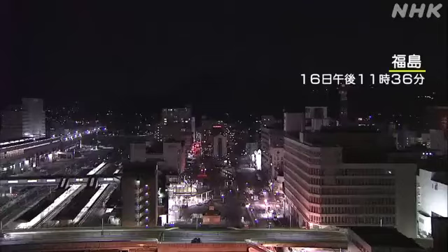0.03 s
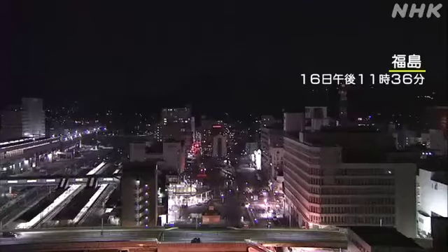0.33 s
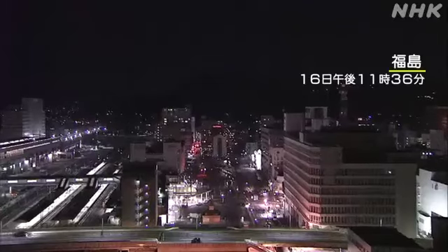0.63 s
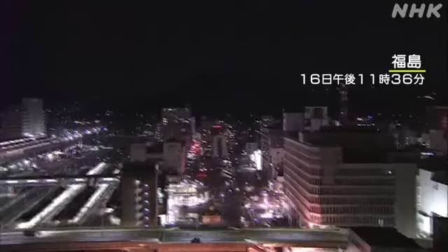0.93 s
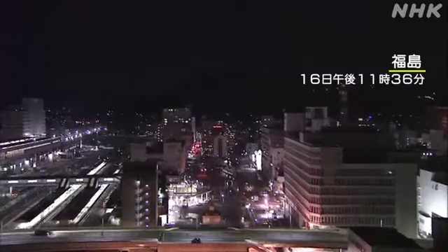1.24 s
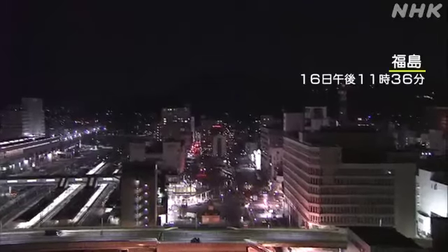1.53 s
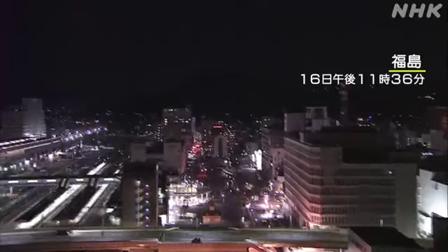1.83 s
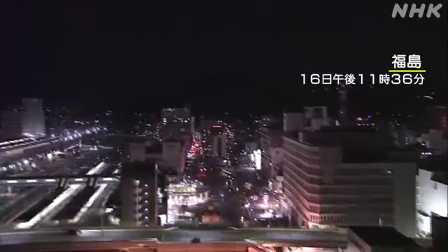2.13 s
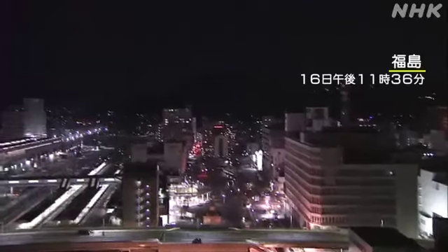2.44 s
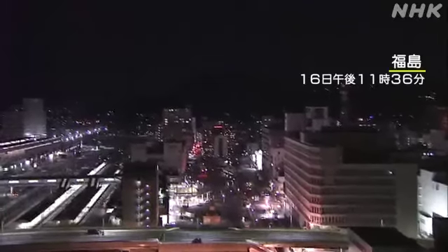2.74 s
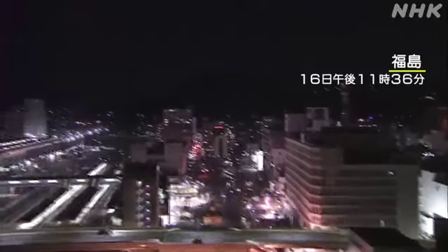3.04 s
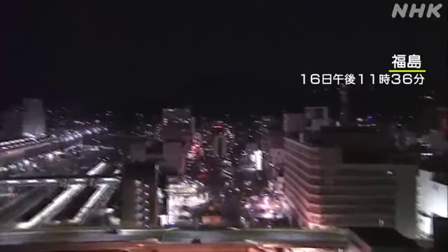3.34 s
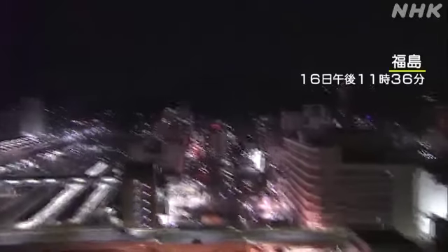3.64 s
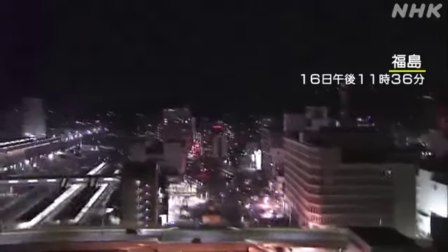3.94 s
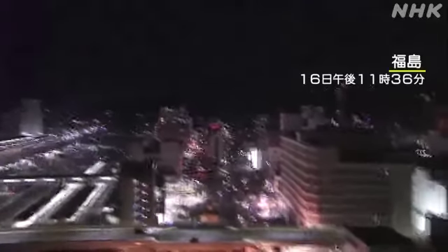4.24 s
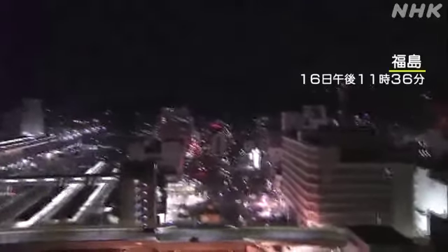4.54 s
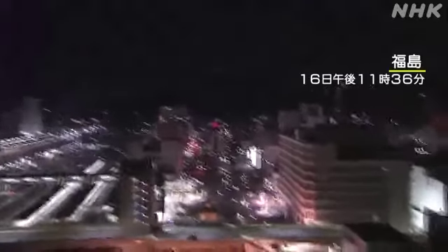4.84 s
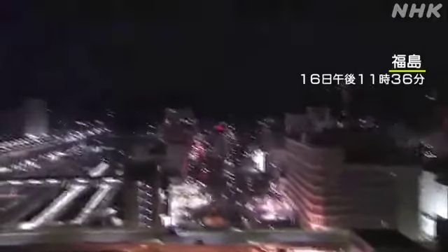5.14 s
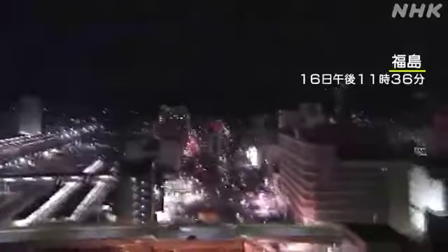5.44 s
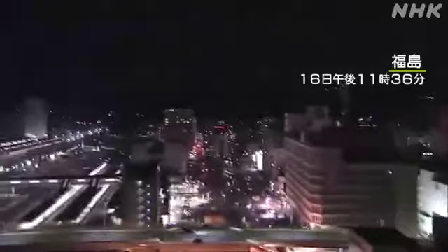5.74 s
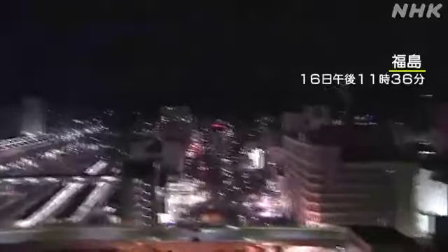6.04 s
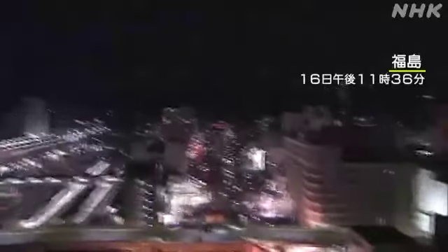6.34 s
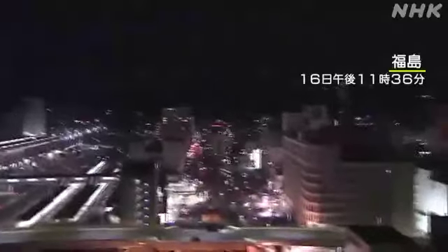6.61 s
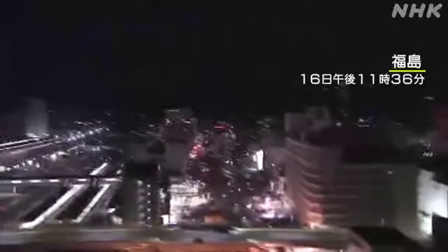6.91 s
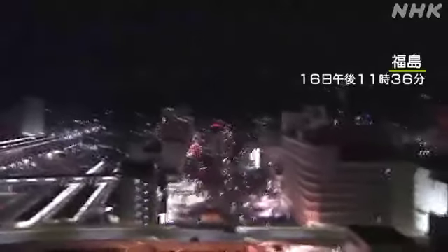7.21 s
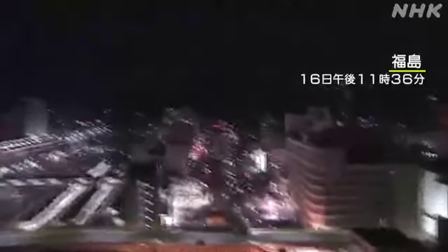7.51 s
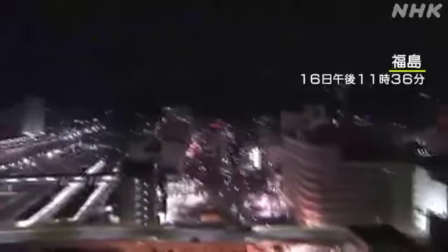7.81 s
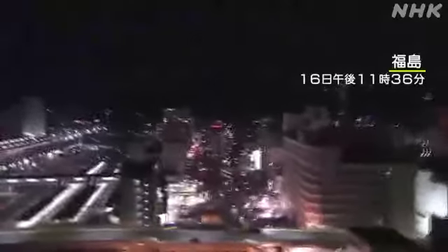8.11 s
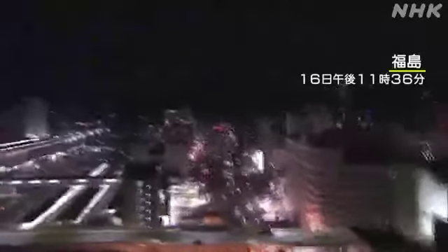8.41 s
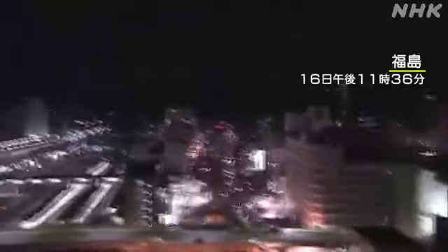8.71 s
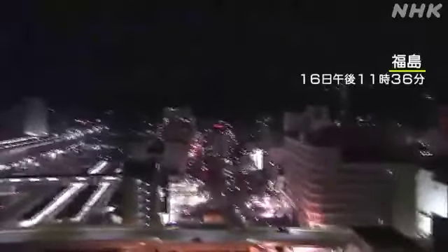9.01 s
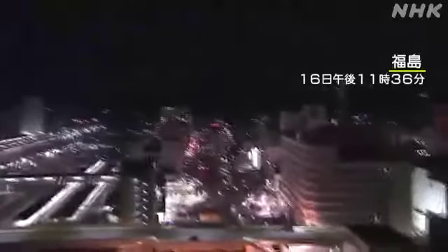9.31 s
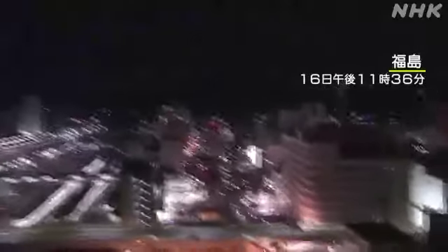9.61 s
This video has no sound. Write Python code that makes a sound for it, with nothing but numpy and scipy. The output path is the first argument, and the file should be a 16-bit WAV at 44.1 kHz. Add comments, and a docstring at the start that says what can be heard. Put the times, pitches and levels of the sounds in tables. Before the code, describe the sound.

A loose camera mount clicks and rattles irregularly while low rumbling and creaking grow as an earthquake strengthens.

```python
"""On a rooftop at night, an earthquake shakes a camera on its mast. The mast sways and booms in surges,
and the joints of the housing crackle, creak and knock more and more as the tremor grows.
The main sound is a loose part of the mount, which clicks, rings and scrapes as it swings against its seat.
Everything comes through the structure, dry and nearly mono, over a faint hiss."""
import sys
import numpy as np
from scipy import signal
from scipy.fft import rfft, irfft, next_fast_len
from scipy.io import wavfile
from scipy.ndimage import map_coordinates

SR = 44100
rng = np.random.default_rng(int(sys.argv[2]) if len(sys.argv) > 2 else 0)


def file_out(sig):
    """Save sig as 16-bit WAV at sys.argv[1]."""
    # one column per channel
    cols = np.atleast_2d(sig).T
    # limit, then scale
    lim = np.clip(cols, -1, 1)
    pcm = np.round(lim * 32767).astype(np.int16)
    wavfile.write(sys.argv[1], SR, pcm)


N = 426006

# How the loose part rings when hit. Each row: frequency in Hz, relative level in dB.
PART_RING = [(300, -16.5), (1800, -26.5), (2580, -25), (2900, -7.5), (3250, -7), (3560, 1.5), (3740, 4.5),
             (4000, 1.5), (4250, -3.5), (4780, -3), (5130, -9.5), (5250, -9.5), (5900, -16.5),
             (6500, -17.5), (7500, -20), (8300, -19), (11000, -27.5), (11850, -34.5), (13000, -33.5)]
# How the shell of the housing rings. Each row: frequency in Hz, relative level in dB.
SHELL_RING = [(150, -25.5), (400, 8.5), (650, 6.5), (980, 4), (1200, 4), (1750, 5), (1930, 5.5), (2060, -2),
              (2450, 3.5), (2650, -5), (2900, 3), (3800, -8.5), (5800, -30.5), (12500, -47)]
STRONG_DB = -50  # the crackle level that counts as full shaking


def amp(db):
    """Turn decibels into a gain."""
    return 10 ** (np.asarray(db) / 20)


def unit(x):
    """Scale a signal to an average (rms) level of 1."""
    return x / np.sqrt(np.mean(x ** 2) + 1e-20)


def along(points, hz):
    """Read between (frequency, value) points on a logarithmic frequency scale."""
    freqs, values = np.transpose(points)
    return np.interp(np.log(hz + 1), np.log(freqs + 1), values)


def curve(points):
    """Join (seconds, value) points with straight lines, one value per sample."""
    times, values = np.transpose(points)
    return np.interp(np.arange(N) / SR, times, values)


def wobble(rate, step=16):
    """A smooth random curve through `rate` new values a second."""
    steps = np.arange(0, N + step, step)
    coarse = map_coordinates(rng.standard_normal(int(N * rate / SR) + 4), [steps * rate / SR])
    return np.interp(np.arange(N), steps, coarse)


def filtered(x, response):
    """Filter x; `response` gives the gain at each frequency."""
    size = next_fast_len(N + SR // 2)
    return irfft(rfft(x, size) * response(np.fft.rfftfreq(size, 1 / SR)), size)[..., :N]


def resonance(hz, ring_hz, width_hz):
    """The response of a mode: one pitch at which an object likes to ring."""
    return 1j * hz * width_hz / (ring_hz ** 2 - hz ** 2 + 1j * hz * width_hz)


def treble_share(hz):
    """A ramp from 0 below the treble to 1 within it."""
    return along([(5000, 0), (6500, 1)], hz)


def struck(gain_db):
    """The ring of an object with this spectrum after one sharp tap, peaking at about 1."""
    cepstrum = irfft(np.log(amp(gain_db)))
    half = len(cepstrum) // 2
    # folding onto the first half puts all the ringing after the tap
    cepstrum[1:half] *= 2
    cepstrum[half + 1:] = 0
    ring = irfft(np.exp(rfft(cepstrum)))
    return ring / np.abs(signal.hilbert(ring)).max()


def vibration(body, steadiness, memory_s):
    """A randomly shaken body with the given spectrum; friction evens out its swings over memory_s."""
    noise = rng.standard_normal(N)
    swing = unit(filtered(noise, lambda hz: amp(along(body, hz)) * (hz < body[-1][0])))
    window = signal.windows.hann(int(memory_s * SR) + 3)
    power = np.abs(signal.fftconvolve(swing ** 2, window / window.sum(), "same")) + .02
    return unit(swing / power ** (steadiness / 2))


def impacts(per_second, spread_db):
    """Tiny hits at random times and of uneven size."""
    sizes = amp(spread_db * np.clip(rng.standard_normal(N), -2, 2)) * rng.choice([-1, 1], N)
    return unit(sizes * (rng.random(N) < per_second / SR))


def shaking(attack_s=0.02, release_s=0.06):
    """Levels of boom, groan and crackle in dB: surges rise, hold and die away on top of a tremor."""
    # The tremor under the surges. Each row: time in seconds, crackle level in dB.
    tremor = [(0.12, -82), (0.8, -73), (1.55, -69), (2.0, -62.5), (2.8, -65), (3.5, -57), (4.7, -52),
              (5.4, -55), (6.6, -49), (7.05, -52.5), (8.6, -44.5), (9.3, -52.5), (9.66, -46)]
    # Surges of shaking. Each row: start and length in seconds, then boom, groan and crackle in dB.
    surges = [(0.175, 0.36, -51.5, -61.5, -69), (0.93, 0.14, -42.5, -57.5, -65.5),
              (1.136, 0.24, -47.5, -58, -63.5), (1.734, 0.16, -37, -49.5, -61), (2.07, 0.26, -43, -51, -61),
              (2.606, 0.071, -50, -62, -66), (3.093, 0.1, -36, -50, -83), (3.26, 0.014, -24, -38.5, -49.5),
              (3.694, 0.25, -22, -39.5, -51), (3.994, .2, -36.5, -55, -83), (4.288, 0.14, -27, -36.5, -50),
              (4.61, 0.024, -27.5, -39, -52.5), (4.828, 0.084, -22, -35.5, -49.5),
              (5.004, 0.27, -25, -39, -51), (5.496, 0.088, -26, -36.5, -47),
              (5.615, 0.072, -25.5, -42, -50), (5.977, 0.16, -22.5, -38, -47),
              (6.294, 0.064, -20, -35, -48.5), (6.379, 0.074, -25, -39.5, -46.5),
              (6.74, 0.21, -30, -41.5, -51.5), (7.128, 0.034, -22.5, -38, -49.5),
              (7.216, 0.32, -32, -45, -49.5), (7.475, 0.16, -28, -37, -48),
              (7.786, 0.07, -21.5, -35, -49.5), (7.941, 0.094, -24.5, -37, -48.5),
              (8.204, 0.25, -31.5, -42, -47), (8.463, 0.14, -29.5, -32, -49.5),
              (8.661, 0.27, -22.5, -34, -47), (8.966, 0.11, -22, -35, -47.5),
              (9.39, 0.059, -24.5, -38.5, -55), (9.61, 0.082, -28, -45, -45.5)]
    t = np.arange(N) / SR
    tremor_db = curve(tremor)
    power = amp([tremor_db + 14, tremor_db + 5, tremor_db]) ** 2  # boom, groan, crackle
    for s, length, *levels_db in surges:
        span = slice(*np.searchsorted(t, [s - attack_s, s + length + 10 * release_s]))
        age = t[span] - s
        swell = np.clip(age / attack_s + .5, 0, 1) * np.exp(-np.maximum(age - length, 0) / release_s)
        power[:, span] += np.outer(amp(levels_db), swell) ** 2
    return 10 * np.log10(power)


def night_hiss(level_db=-75):
    """The faint, even background hiss of the night."""
    # The tone of the hiss. Each row: frequency in Hz, relative level in dB.
    spectrum = [(100, -4), (500, -4.5), (1900, -5), (2100, -22.5), (2550, -13), (2800, -4.5), (3500, -24),
                (5000, -17), (7000, -23.5), (12000, -42)]
    return amp(level_db) * unit(filtered(rng.standard_normal(N), lambda hz: amp(along(spectrum, hz))))


def mast_sway(crackle_db, smoothing_s=0.16):
    """The heavy mast follows the shaking slowly, with a very deep rumble."""
    # The tone of the sway. Each row: frequency in Hz, relative level in dB.
    body = [(6, -30.5), (12, 5), (20, -3), (29, 4.5), (40, 0), (52, -9), (80, -6.5), (200, -108)]
    window = signal.windows.hann(int(smoothing_s * SR))
    power = np.abs(signal.fftconvolve(amp(crackle_db) ** 2, window / window.sum(), "same"))
    sway_db = -33.5 + 0.75 * (10 * np.log10(power) - STRONG_DB)
    return amp(sway_db) * vibration(body, steadiness=0.88, memory_s=0.18)


def mast_drone():
    """The mast's low mode: pure in small swings, lower and rougher when large ones make the joints slip."""
    # The drone builds and fades at its own pace. Each row: time in seconds, level in dB.
    levels = [(0.3, -44.5), (0.6, -53), (1.3, -39), (1.65, -46.5), (2.2, -39), (2.95, -42.5), (3.3, -36.5),
              (4.8, -34.5), (5.6, -31.5), (5.9, -38), (6.5, -33.5), (7.1, -32), (7.5, -31.5), (8.9, -29),
              (9.66, -59)]
    # Its tone with tight joints. Each row: frequency in Hz, relative level in dB.
    tight_body = [(35, -24.5), (58, -25), (64, -18), (66, -8.5), (68.5, -6), (74, -32.5), (110, -23.5)]
    # Its tone with slipping joints. Each row: frequency in Hz, relative level in dB.
    loose_body = [(35, -16.5), (50, -8), (60, 4), (65, 0), (72, -5), (110, -54)]
    drone_db = curve(levels)
    slip = np.clip((drone_db + 42.5) / 5, 0, 1)
    tight = vibration(tight_body, steadiness=0.87, memory_s=0.3)
    loose = vibration(loose_body, steadiness=0.67, memory_s=0.59)
    return amp(drone_db) * (np.sqrt(1 - slip) * tight + np.sqrt(slip) * loose)


def mast_boom(boom_db, tone_share=0.59):
    """The mast's second mode booms in each surge: a throbbing tone with noise around it."""
    # The pitch shifts as the joints bind and slip. Each row: time in seconds, pitch in Hz.
    pitches = [(1.8, 105), (3.3, 115), (3.75, 109), (4.0, 114), (4.3, 104), (4.85, 108), (5.12, 105),
               (5.25, 116), (5.55, 109), (6.15, 113), (6.9, 108), (7.3, 101), (8.15, 114), (8.7, 107),
               (9.4, 113)]
    # The noise around the tone. Each row: frequency in Hz, relative level in dB.
    body = [(50, -52), (78, -15.5), (95, -9), (105, -7), (113, -4), (120, -10), (131, -12), (150, -41.5),
            (260, -42)]
    pitch_hz = curve(pitches) + 3.526 * wobble(30)
    throb = amp(1.3 * wobble(22))
    tone = unit(np.sin(2 * np.pi * np.cumsum(pitch_hz) / SR) * throb)
    noise = vibration(body, steadiness=1.0, memory_s=0.1)
    return amp(boom_db) * (np.sqrt(tone_share) * tone + np.sqrt(1 - tone_share) * noise)


def mast_groan(groan_db):
    """The mast's upper modes groan as it is shaken."""
    # The tone of the groan. Each row: frequency in Hz, relative level in dB.
    body = [(100, -13), (145, -3), (172, 4), (205, -7), (235, -7), (262, -11.5), (310, -8), (380, -16.5),
            (480, -21), (900, -59)]
    return amp(groan_db) * vibration(body, steadiness=0.34, memory_s=0.089)


def stiff_mount(swing, limit_db=-17.5):
    """The mount stiffens at the largest swings and rounds them off."""
    return swing / (1 + np.abs(swing / amp(limit_db)) ** 4) ** (1 / 4)


def mast_thuds(size=4096):
    """The mast hits its stops; each dull push rings its upper modes."""
    # Hits on the stops. Each row: start in seconds, peak level in dB.
    hits = [(4.617, -36), (4.835, -23), (4.877, -26), (5.212, -34), (5.531, -30), (6.289, -27.5),
            (6.322, -24.5), (7.148, -27), (8.523, -30), (8.813, -27)]
    # The tone of a thud. Each row: frequency in Hz, relative level in dB.
    body = [(90, -17.5), (175, 2), (240, 0.5), (320, -0.5), (450, -8), (800, -18.5), (2500, -48)]
    ring = struck(along(body, np.fft.rfftfreq(size, 1 / SR)))
    out = np.zeros(N + size)
    for s, db in hits:
        out[round(s * SR):][:size] += amp(db) * ring
    return out[:N]


def housing_crackle(crackle_db, split_hz=1200, size=1024):
    """Rubbing joints make the shell crackle; a low and a high set flare up, partly on their own."""
    shell = struck(along(SHELL_RING, np.fft.rfftfreq(size, 1 / SR)))
    shared_flare_db = 1.65 * wobble(55)

    def joints():
        friction = unit(impacts(per_second=500, spread_db=4.0) + 0.99 * rng.standard_normal(N))
        return friction * amp(shared_flare_db + 4.5 * np.minimum(wobble(80), 1))

    low_share = lambda hz: 1 / (1 + (hz / split_hz) ** 4)
    low = filtered(joints(), lambda hz: np.sqrt(low_share(hz)))
    high = filtered(joints(), lambda hz: np.sqrt(1 - low_share(hz)))
    return amp(crackle_db - 0.8) * unit(signal.fftconvolve(low + high, shell)[:N])


def housing_creaks(crackle_db):
    """Slipping joints set single panel modes ringing, each in its own short flares."""
    # Panel modes. Each row: pitch in Hz, width in Hz, level in dB compared with the crackle.
    modes = [(738, 270, -11.5), (946, 184, -15), (1674, 340, -15), (1908, 127, -11.5), (2426, 160, -19),
             (2872, 230, -11)]
    out = np.zeros(N)
    for ring_hz, width_hz, db in modes:
        slips = impacts(per_second=400, spread_db=2.5) * amp(3.5 * np.minimum(wobble(40), 1))
        out += amp(db) * unit(filtered(slips, lambda hz: resonance(hz, ring_hz, width_hz) ** 2))
    return amp(crackle_db) * out


def housing_knocks(size=2048):
    """Panels bump together: a short, rough push rings the shell, most of all near one pitch."""
    # Dull knocks. Each row: start in seconds, relative level in dB, pitch in Hz.
    bumps = [(3.769, -22.5, 800), (3.892, -23.5, 840), (4.176, -28, 910), (4.335, -28, 900),
             (4.415, -22, 855), (4.48, -24.5, 765), (5.524, -26, 1310), (5.551, -31, 599),
             (5.976, -25.5, 1010), (6.115, -25.5, 1640), (6.326, -27, 620), (6.359, -25.5, 1970),
             (7.503, -22.5, 840), (7.549, -26, 560), (8.201, -20.5, 1810), (8.331, -18, 1850),
             (8.35, -19, 1030), (8.527, -20, 1870), (8.569, -14.5, 1030), (8.6, -20, 1820),
             (8.662, -22, 746), (8.73, -20.5, 1390), (8.856, -21.5, 1850), (8.959, -23.5, 720),
             (9.029, -23, 960)]
    hz, t = np.fft.rfftfreq(size, 1 / SR), np.arange(size) / SR
    shell = rfft(struck(along(SHELL_RING, hz)))
    envelope = amp(-60 * t / 0.051) * (1 - np.exp(-t / 0.00021))
    out = np.zeros(N + size)
    for s, db, ring_hz in bumps:
        push = rng.standard_normal(size) * envelope
        knock = irfft(rfft(push) * resonance(hz, ring_hz, width_hz=420) * shell)
        out[round(s * SR):][:size] += amp(db - 9.0) * knock / np.abs(knock).max()
    return out[:N]


def fine_rattle(crackle_db, boom_db, slide_db=-48, jolt_db=-28.5, size=1024):
    """The loose part taps lightly; in strong shaking it scrapes on its seat without a break."""
    # The tone of the brightest scraping. Each row: frequency in Hz, boost or cut in dB.
    bright_tilt = [(5000, -1.5), (6000, 1.5), (9000, 1), (12000, -17)]
    dull_tilt = [(4200, 8.5), (5300, 10.0), (8000, -17.0)]  # the same for light contacts
    hz = np.fft.rfftfreq(size, 1 / SR)
    sliding = amp(-12.5 * np.log10(1 + amp(slide_db - crackle_db) ** 2))  # fades below slide_db
    pressure = amp(7.4 * np.clip(wobble(110), -2, 1.5) + 2.8 * wobble(25))
    taps = impacts(per_second=110, spread_db=2.0) * pressure
    rubbing = impacts(per_second=2400, spread_db=8.5) * pressure
    soft_ring = struck(along(PART_RING, hz) + along(dull_tilt, hz))
    hard_ring = struck(along(PART_RING, hz) + along(bright_tilt, hz))
    tapping = unit(signal.fftconvolve(taps, soft_ring)[:N])
    dull, bright = [unit(signal.fftconvolve(rubbing, ring)[:N]) for ring in (soft_ring, hard_ring)]
    jolt = np.clip(boom_db - jolt_db, 0, 1)  # the scraping brightens in each jolt
    scraping = (1 - jolt) * dull + jolt * bright
    return sliding * (amp(-50) * sliding * tapping + amp(-48.5) * scraping)


def part_contacts(crackle_db, swing_s=.041, touch_chance=.5, seated_db=-52, max_swings=12):
    """List the loose part's blows, clinks and scrapes, and add random light touches in the gaps."""
    # Hard blows. Each row: time in seconds, level in dB, chatter in dB compared with that level,
    # bandwidth in Hz (higher is brighter), boost of the upper modes in dB.
    blows = [(0.2215, -27, -24.0, 5270, 3), (0.2924, -24.5, -19, 6700.0, -1.0),
             (0.371, -29.5, -9.5, 5400, 2), (0.4589, -30.5, -15.5, 5070.0, 2),
             (0.5344, -30.5, -24, 5350, 4), (0.7475, -40.5, -29, 4420.0, 3), (0.9395, -16, -22, 5270.0, 5),
             (1.0172, -17.5, -29.0, 7100.0, 3), (1.112, -22.5, -20, 5200.0, 4),
             (1.2748, -26.0, -19, 5060, 6), (1.384, -20.5, -38.0, 5900, 10.0),
             (1.5667, -31.5, -17.5, 5200, 2), (1.6365, -21.0, -19.5, 5030, 1), (1.7811, -20, -16, 6740, 0),
             (1.8188, -17.5, -17.5, 7650, -2), (1.9163, -19.5, -32, 5500.0, 4),
             (2.0523, -15.5, -19, 5240.0, 5), (2.139, -14.5, -20, 7500, 2.0),
             (2.195, -25.0, -10.5, 5260.0, 2), (2.2286, -18.5, -37.0, 5100, 3),
             (2.2673, -28.0, -24.0, 5160, -9), (2.3006, -19, -31, 6600.0, 5),
             (2.3756, -20.5, -33.0, 7160.0, 2.0), (2.4349, -29.5, -21, 5440, 1),
             (2.6388, -21.5, -16, 7600.0, -1.5), (2.913, -22.5, -20.0, 8340, -3),
             (2.947, -21.5, -24, 6660.0, 3), (3.0235, -19.5, -20, 6650.0, 3),
             (3.0723, -20.5, -18, 5000.0, 1.0), (3.109, -18, -19, 8000.0, -4.5),
             (3.15, -20, -18.5, 7500.0, -2), (3.1851, -16, -21, 7000, 3.0),
             (3.2328, -18.5, -16.0, 7600, -1), (3.2702, -18, -22, 10300.0, 2),
             (3.4707, -32, -14.5, 5200.0, -9), (3.5356, -17, -33.0, 6460, 6), (3.6236, -18.5, -27, 7600, 6),
             (3.6769, -18, -16, 5000.0, 2.0), (3.8027, -18, -20.5, 9300, -1),
             (3.8465, -23, -21, 8340.0, -2), (3.8575, -30, -7.5, 7840, 1), (3.8914, -25, -14.5, 9050, 0),
             (3.9505, -20.5, -16.5, 6600, -3), (4.0691, -20, -30.0, 7700, 4),
             (4.2529, -30.5, -15.5, 5840, -4), (4.3271, -16.5, -35.0, 8230, 0.0),
             (4.4135, -20.5, -23, 8400, 4), (4.5937, -24.0, -23, 6940.0, 1), (4.803, -17, -19.5, 7460, -4),
             (4.837, -21, -30.0, 12800.0, 0), (4.9281, -15.5, -18.5, 8900.0, -1),
             (4.979, -17.5, -20.5, 8400, -2.0), (5.0184, -20.5, -20, 8250.0, 1.0),
             (5.0544, -16.5, -19.5, 8500, -2), (5.095, -14.5, -38, 8950.0, 0.5),
             (5.1778, -18, -15.5, 9000.0, 0), (5.2094, -26.0, -21, 8750, -4),
             (5.2812, -26.5, -10.5, 8340.0, 1.0), (5.3804, -28.5, -14, 7500.0, 1),
             (5.4446, -18.5, -30.0, 7740, 1.0), (5.4863, -23, -21, 8500, -4.0),
             (5.4998, -18.0, -37, 7760, 1), (5.8091, -15, -35, 6440, 1), (5.947, -18.5, -18.0, 8450.0, 2.0),
             (5.978, -15.5, -21, 10900.0, 0.0), (6.1138, -26, -12, 9000.0, -4),
             (6.1933, -25, -10, 7200, -5), (6.2898, -17.5, -32, 10100.0, 7),
             (6.4177, -27.0, -13, 8800.0, 3.0), (6.4791, -20, -17.5, 9400, -4),
             (6.522, -17, -24, 7650, 1.0), (6.5437, -26.5, -28, 7360.0, -5.0),
             (6.651, -22.5, -20, 7200.0, -6.0), (6.7051, -17.5, -17, 7750, 0.0),
             (6.7739, -15.5, -38.0, 9000.0, 1), (6.8632, -15, -36, 9300, 3), (6.9124, -20, -16.5, 8700, -6),
             (6.9656, -26, -17, 6000.0, -9), (7.0252, -20.5, -18.5, 6700, -2),
             (7.073, -14.0, -21.5, 6000, 0), (7.118, -23, -7.5, 7040, 1), (7.265, -30.0, -4.5, 9000.0, 1),
             (7.3925, -24.5, -11.0, 8300, -3.0), (7.443, -20.5, -12.5, 9500.0, 1.0),
             (7.5917, -20, -25, 9150, -5), (7.6069, -24, -22.0, 7800.0, 5.0),
             (7.6249, -21.5, -28, 8400.0, -7.0), (7.648, -15.5, -35.0, 9400, -2.0),
             (7.6894, -21.5, -21.5, 7160, -4.0), (7.7256, -20, -29, 7100, 1),
             (7.752, -18, -19.5, 7300.0, -5), (7.795, -17.5, -26, 7100, 0.0),
             (7.8327, -19.0, -22.0, 10000.0, -3), (7.8512, -26, -14.5, 8000.0, -7.0),
             (8.0308, -24.5, -16.5, 9350, -1), (8.0948, -20.0, -17.5, 10600.0, -2),
             (8.1289, -28, -11, 6500.0, -3), (8.1473, -26, -23, 5600.0, -8), (8.2486, -14, -20.5, 7000, -2),
             (8.2835, -25, -15, 8450, -3), (8.3121, -14.5, -43.0, 6500, -1), (8.3783, -15, -24, 9300, 0),
             (8.5297, -16.0, -35, 10300.0, 0), (8.5672, -12.5, -46, 7640, 0),
             (8.6122, -15, -41, 10500.0, 2), (8.6353, -19, -20.5, 9000, -1.0),
             (8.745, -16.5, -43, 9900.0, -6), (8.8398, -23.5, -20, 8660, -9),
             (8.893, -19.5, -20.5, 8600.0, -1.0), (8.936, -18.5, -27, 10500, 1),
             (8.986, -16, -40.0, 8060.0, -3.0), (9.0438, -18, -37.0, 10000.0, 3),
             (9.075, -20.0, -36, 11450.0, 5), (9.1342, -22.5, -18.5, 8800, -6),
             (9.2943, -27.5, -20, 7600, 0.0), (9.3632, -18.5, -17, 7500.0, -1),
             (9.404, -13.5, -29, 7100, 0), (9.4464, -20.5, -29, 8950, 0), (9.49, -19, -20.5, 7400, 3.0),
             (9.613, -14.5, -40.0, 5140.0, 3.5)]
    # Soft blows that mostly ring the main mode. Each row: time in seconds, level in dB.
    clinks = [(0.897, -38), (1.1485, -27.5), (1.1865, -22.5), (1.2252, -31.5), (1.432, -40), (1.591, -28.5),
              (1.739, -18.5), (2.5472, -23.5), (2.5914, -21), (2.676, -26), (2.776, -37), (2.8085, -25.5),
              (2.8865, -33), (3.349, -25), (3.4222, -25), (4.293, -22.5), (4.72, -25.5), (5.704, -24),
              (5.8983, -22), (7.1895, -22), (9.2, -25)]
    # Grazing contacts that skitter along the seat. Each row: time in seconds, level in dB, bandwidth in Hz.
    scrapes = [(0.257, -44.5, 7400), (0.334, -43.5, 8150), (0.414, -49, 7900), (0.492, -47, 7300),
               (0.791, -49, 7860), (0.985, -35.5, 7500), (1.074, -34, 7200), (1.699, -36.5, 7500),
               (1.873, -32.5, 8140), (2.02, -34, 7060), (2.097, -36, 8300), (2.344, -36, 8300),
               (2.994, -35.5, 6800), (3.312, -29.5, 7000.0), (3.381, -38.0, 5140), (3.768, -38, 9000),
               (3.923, -38.5, 8550), (4.109, -38.5, 8400.0), (4.364, -37, 9200), (4.53, -40.5, 7200),
               (4.633, -42, 8100.0), (4.674, -37.5, 9600), (5.237, -36, 8500.0), (5.331, -36, 7260),
               (5.357, -39, 7300), (5.565, -38.5, 8500.0), (5.64, -41, 7800.0), (5.673, -40, 6100.0),
               (5.746, -44, 5230), (5.77, -43, 5200), (5.864, -35, 8400), (6.028, -33.5, 8950),
               (6.239, -44.5, 8560), (6.375, -39, 9600), (6.614, -41, 5900.0), (6.747, -48, 7100),
               (6.818, -35, 4900), (7.149, -37, 9600), (7.354, -42, 6000.0), (7.489, -42, 8500.0),
               (7.509, -41, 8460), (7.557, -39, 9400.0), (7.915, -39.0, 8400.0), (7.945, -32.5, 7900.0),
               (7.994, -42, 8100.0), (8.067, -37, 7300), (8.226, -48, 7800.0), (8.425, -41, 6700.0),
               (8.483, -38.5, 9100.0), (8.672, -37.5, 7800.0), (8.7, -42, 8800), (8.766, -31, 9800),
               (8.808, -37, 9500.0), (8.867, -37, 8500.0), (9.02, -41, 7850), (9.268, -40.5, 6400.0),
               (9.589, -47, 5800.0)]
    rows = list(blows)  # every contact gets the same five columns as a blow
    rows += [(s, db, -19, 4240, 0) for s, db in clinks]
    rows += [(s, db, -1, band_hz, 0) for s, db, band_hz in scrapes]
    times = sorted(row[0] for row in rows)
    for start, end in zip(times, times[1:]):
        swings = np.linspace(start, end, max(round((end - start) / swing_s), 1) + 1)[1:-1]
        scatter = np.clip(rng.standard_normal((max_swings, 4)), -2, 2)
        for s, miss, (late, force, graze, bright) in zip(swings, rng.random(max_swings), scatter):
            if miss > touch_chance:
                continue
            shake_db = crackle_db[round(s * SR)]  # stronger shaking makes a touch louder and brighter
            db = -35.5 + 2 * force + 2 * min(shake_db - seated_db, 0)
            band_hz = 8050 * 2 ** (0.045 * (shake_db - STRONG_DB) + 0.18 * bright)
            rows.append((s + .004 * late, db, -9 + 6 * graze, band_hz, 0))
    return rows


def contact_ring(hz, band_hz, upper_db, detune, snap_hz=7060, main_mode_hz=3600):
    """The spectrum of one contact: a hard one snaps far into the treble, a soft one tinks in one mode."""
    reach_hz = band_hz * max(band_hz / snap_hz, 1) ** 0.69
    rolloff_db = 10 * np.log10(1 + (hz / reach_hz) ** 16)
    hardness_db = np.maximum(12 * np.log2(band_hz / 8000) * treble_share(hz) - rolloff_db, -45)
    softness = np.clip((5000 - band_hz) / 1200, 0, 1)
    tink_db = 11 * softness / (1 + ((hz - main_mode_hz) / 190) ** 2)
    # where the part is hit decides how much its upper modes ring
    upper_modes = along([(3900, 0), (4500, 1), (5200, 1), (6500, 0)], hz)
    return rfft(struck(along(PART_RING, hz * detune) + hardness_db + tink_db + upper_db * upper_modes))


def loose_part(crackle_db, size=3600, skitters=5):
    """The part strikes, bounces twice, skitters and scrapes; gives a middle and a side (stereo) signal."""
    # Rubbing is brighter than a blow. Each row: frequency in Hz, boost in dB.
    rub_tilt = [(5000, 3.5), (6000, 6.5), (9000, 4.5), (12000, 0)]
    # Stereo spread of scrape and splash. Each row: frequency in Hz, side compared with middle in dB.
    width = [(2500, -53.5), (3800, -46), (4800, -25), (8000, -22.5)]
    hz = np.fft.rfftfreq(size, 1 / SR)
    lead = size // 3  # room for the sound just before the blow
    t = (np.arange(size) - lead) / SR
    treble = treble_share(hz)
    rub_floor = amp(along(PART_RING, hz) - 12) / (1 + (hz / 7500) ** 10)
    out = np.zeros((2, N + 2 * size))
    for s, db, chatter_db, band_hz, upper_db in part_contacts(crackle_db):
        when, strength, hop, sign = rng.random((4, skitters))
        noise = rng.standard_normal((3, size))
        detune = 1 + 0.12 * (hop[3] - .5)  # the point of contact shifts the ring a little
        ring = contact_ring(hz, band_hz, upper_db, detune)
        # a clean blow skitters mostly afterwards; a grazing one on the way in as well
        grazing = np.clip((chatter_db + 22.0) / 13, .08, 1)
        skitter_s = .015 * (when - grazing / 2)
        skitter_gains = amp(chatter_db + 4.5 + 3.7 * strength) * np.sign(sign - .5)
        bounce_s = np.cumsum(.0008 + .0011 * hop[:2])
        bounce_db = np.interp(chatter_db, [-38, -18], [-11, -6]) + 5 * (hop[2] - .5)
        delays = np.r_[0, bounce_s, skitter_s] + lead / SR
        gains = np.r_[1, amp(bounce_db), amp(bounce_db - 5), skitter_gains]
        hits = gains @ np.exp(-2j * np.pi * np.outer(delays, hz))  # the spectrum of all these taps
        # the many high modes blur into a short splash
        splash = rfft(amp(-19.5 - 60 * np.abs(t) / 0.027) * (t > 0) * noise[0]) * treble
        # the part slides along its seat before and after the blow
        lead_in = np.where(t > 0, 1, max(grazing, 0.12))
        slide = amp(chatter_db - 18.5) * np.exp(-np.abs(t) / 0.0079) * lead_in
        scrape_mid, scrape_side = rfft(slide * noise[1:]) * amp(6.4 * treble + along(rub_tilt, hz))
        # even a soft contact rubs with some treble
        rub_tone = np.maximum(np.abs(ring), np.abs(ring).max() * rub_floor)
        mid = ring * (hits * amp(-3 * treble) + splash) + rub_tone * scrape_mid
        side = (rub_tone * scrape_side + 1j * ring * splash) * amp(along(width, hz))
        start = round(s * SR)
        out[:, start:start + size] += amp(db - 1.97) * irfft(np.array([mid, side]))
    return out[:, lead:lead + N]


def scene():
    """Mix the shaking structure in the middle; only the loose part spreads a little to the sides."""
    boom_db, groan_db, crackle_db = shaking()
    rattle = fine_rattle(crackle_db, boom_db)
    housing = housing_crackle(crackle_db) + housing_creaks(crackle_db) + housing_knocks()
    swing = mast_sway(crackle_db) + mast_drone() + mast_boom(boom_db)
    mast = stiff_mount(swing) + mast_groan(groan_db) + mast_thuds()
    clicks, side = loose_part(crackle_db)
    mid = night_hiss() + mast + housing + rattle + clicks
    return np.array([mid + side, mid - side])


def record(dry):
    """The microphone opens just after the start and cuts off the highest treble."""
    open_s, fade_s, top_hz = 0.1207, 0.013, 13300
    opened = np.clip((np.arange(N) / SR - open_s) / fade_s + .5, 0, 1)
    return filtered(dry * opened, lambda hz: 1 / (1 + (hz / top_hz) ** 60))


dry = scene()
out = record(dry)
file_out(out)
```